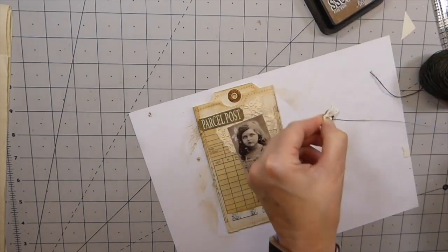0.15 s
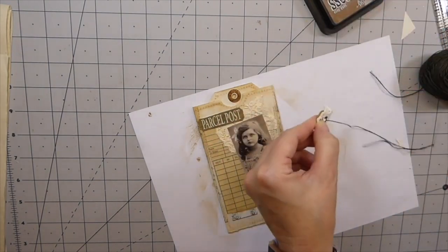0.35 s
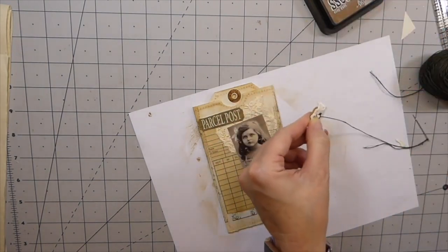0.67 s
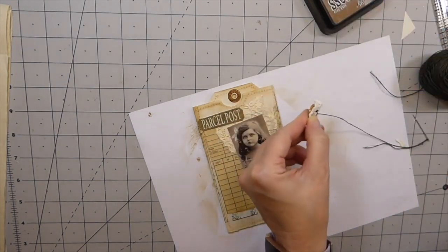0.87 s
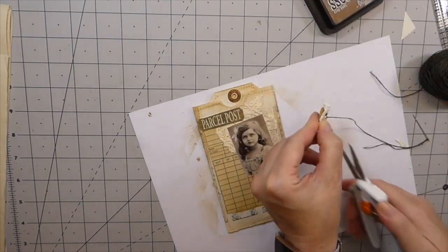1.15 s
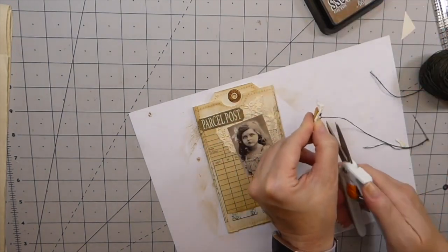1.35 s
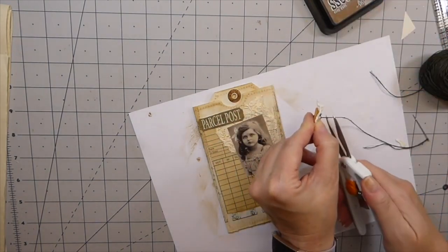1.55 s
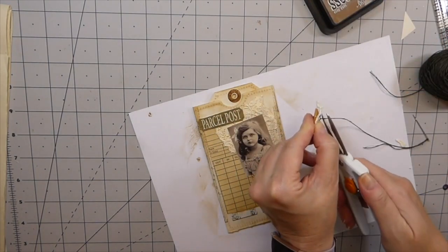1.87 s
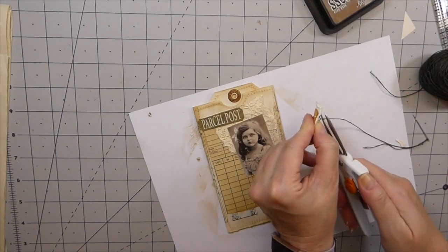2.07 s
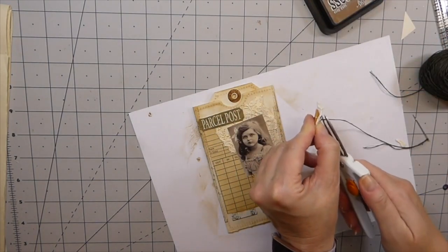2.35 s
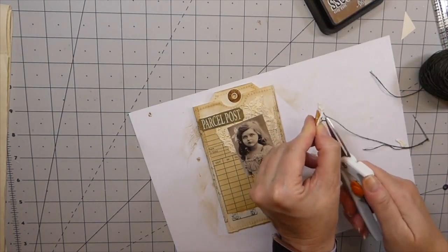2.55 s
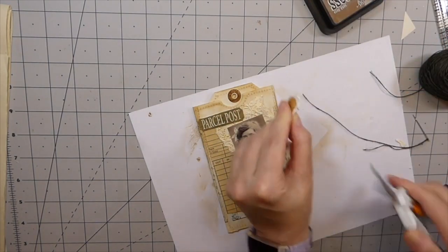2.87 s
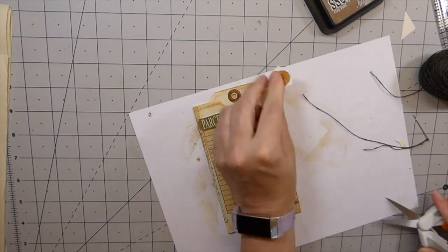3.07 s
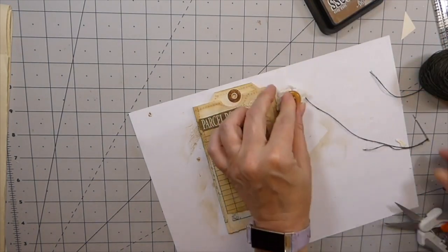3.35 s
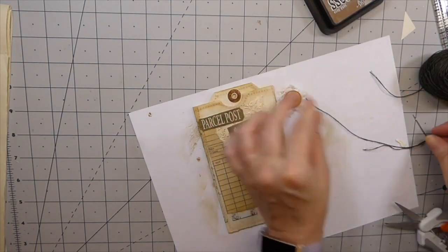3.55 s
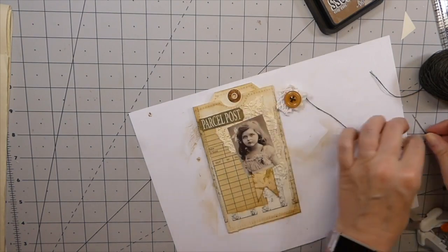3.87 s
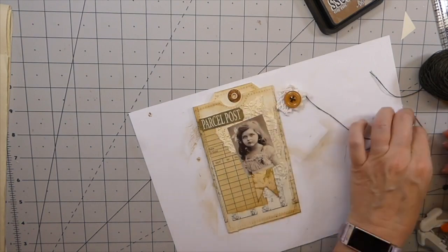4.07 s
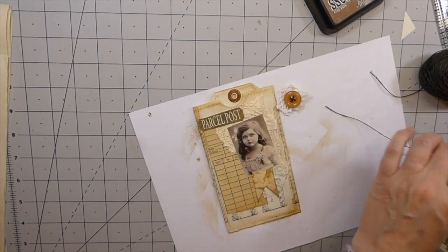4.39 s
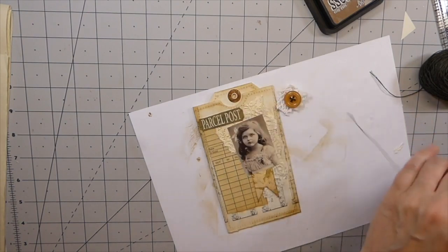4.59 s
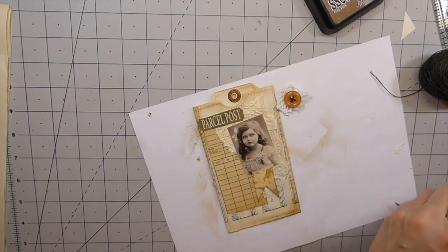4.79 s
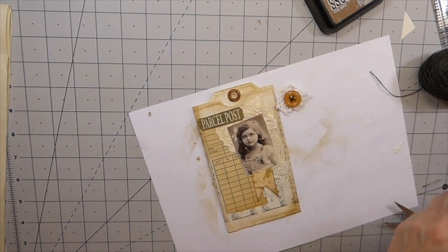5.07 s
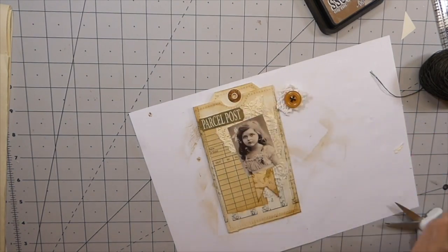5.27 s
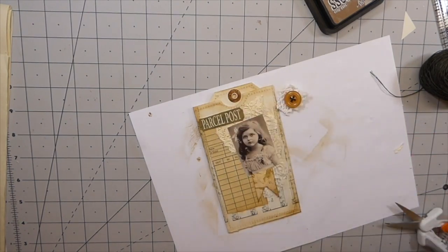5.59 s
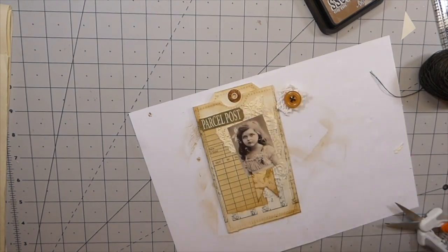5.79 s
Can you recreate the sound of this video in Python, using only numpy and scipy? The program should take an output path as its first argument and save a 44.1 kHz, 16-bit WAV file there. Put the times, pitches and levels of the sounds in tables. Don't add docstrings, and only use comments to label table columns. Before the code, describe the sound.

Close overhead stereo pickup of a craft table: a cluster of light metal ticks and short scrapes, small knocks, then only steady soft air noise. A bright quick snip through thread, a pause, then scissors smack the mat with a hard metallic crack, low table thump and short room tail. Tiny rubs and touches end it, fading to the distant fan.

```python
import sys
import numpy as np
from scipy import signal
from scipy.fft import rfft, irfft, next_fast_len
from scipy.io import wavfile
from scipy.ndimage import map_coordinates

SR = 44100
rng = np.random.default_rng(int(sys.argv[2]) if len(sys.argv) > 2 else 0)


def volts(x):
    e = np.asarray(x, float) / 20
    return 10 ** e


def persist_wave(psi):
    counts = np.round(np.clip(psi, -1, 1) * 32767).astype(np.int16)
    wavfile.write(sys.argv[1], SR, np.atleast_2d(counts).T)


N = 261513
SPAN = 8192

# (frequency [Hz], width [Hz], level [dB])
BLADES = [(6060, 625, -8.5), (6660, 790, -4.5), (7600, 880, -8.5), (8935, 480, -2.5), (9470, 580, -1.5),
          (10200, 300, -1), (11000, 150, -0.5), (12700, 600, -7)]
# (frequency [Hz], width [Hz], level [dB])
HANDLES = [(2470, 730, -2.5), (2820, 310, -1.5), (3192, 240, 0), (4362, 630, -3), (4700, 240, -3),
           (5300, 420, -4)]
# (frequency [Hz], width [Hz], level [dB])
KNOCK = [(670, 500, -3), (1005, 270, 4), (1220, 510, 2.5), (2074, 660, -1.5), (2866, 230, -10)]
# (frequency [Hz], width [Hz], level [dB])
MAT = [(336, 70, 0), (501, 82, 3), (680, 200, 1.5), (850, 430, -3.5), (1790, 1500, -16.5)]


def unit(x):
    return x / np.sqrt(np.mean(x ** 2) + 1e-20)


def along(points, hz):
    f, v = np.transpose(points)
    return np.interp(np.log(hz + 1), np.log(f + 1), v)


def curves(rows, rest=None):
    s, *columns = np.transpose(rows)
    t = np.arange(N) / SR
    return [np.interp(t, s, column, rest, rest) for column in columns]


def filtered(x, response):
    m = next_fast_len(x.shape[-1] + SPAN)
    spectrum = rfft(x, m) * response(np.fft.rfftfreq(m, 1 / SR))
    return irfft(spectrum, m)[..., :x.shape[-1]]


def body(modes, scatter_db=0):
    luck = rng.standard_normal(len(modes))

    def response(f):
        total = 0
        for k, (centre, width, db) in enumerate(modes):
            resonance = 1j * f * width / (centre * centre - f * f + 1j * f * width)
            total = total + (-1) ** k * volts(db + scatter_db * luck[k]) * resonance
        return total

    return response


def add(track, s, db, sound):
    track[round(s * SR):][:len(sound)] += volts(db) * sound / np.abs(sound).max()


def chatter(t60, spike):
    t = np.arange(SPAN) / SR
    force = rng.standard_normal(SPAN) * volts(-60 * t / max(t60, .001)) * (1 - np.exp(-t / 0.0001))
    force[4] += spike
    return force


def drop():
    # (time [s], blade crack peak [dB], handle crack peak [dB], slap peak [dB], chatter t60 [s])
    impacts = [
        (3.2261, -5.5, -9.5, -18, 0.0018),
        (3.2268, -17, -15, -8, 0.0074),
        (3.2295, -30.5, -17.5, -14, 0.02),
        (3.302, -29.5, -28, -26, 0.0055),
        (3.3033, -39, -31, -23, 0.023),
    ]
    # (frequency [Hz], width [Hz], level [dB])
    tip = [(7100, 820, -8), (7600, 1300, -3.5), (9780, 1300, -1.5), (10400, 900, -0.5), (11560, 1000, -8.5)]
    crack = [(2344, 510, -9), (3230, 240, 3.5), (4450, 990, -1.5)]
    slap = [(419, 120, 2), (750, 240, 3), (1010, 335, 3.5), (1259, 360, -4.5), (1560, 340, -6.5),
            (2100, 300, -4)]
    # (frequency [Hz], density [dB per Hz])
    spread = [(240, -31), (400, -3.5), (1100, -8), (1280, -10), (2120, -6.5), (2460, -10.5), (6090, -22.5),
              (9650, -24), (14000, -47.5)]
    out, blows = np.zeros(N + SPAN), np.zeros(N)
    for s, *levels_db, t60 in impacts:
        blows[round(s * SR)] = np.linalg.norm(volts(levels_db))
        for modes, db in zip((tip, crack, slap), levels_db):
            add(out, s, db, filtered(chatter(t60, spike=6.8), body(modes)))
    return out[:N], filtered(blows, lambda hz: volts(along(spread, hz)))


def thuds():
    # (time [s], peak [dB], pitch [Hz])
    pushes = [(.442, -36.5, 478), (.509, -40, 536), (.519, -35.5, 520), (.544, -47, 351), (.634, -56, 590),
              (.649, -42.5, 243), (.795, -38.5, 438), (.819, -33.5, 470), (3.301, -23, 293),
              (3.311, -20.5, 264.6), (3.813, -54.5, 597), (3.983, -37, 268), (3.994, -45, 272),
              (4.016, -45, 336), (4.963, -50, 262)]
    # (time [s], peak [dB], pitch [Hz])
    slams = [
        (3.164, -23, 294),
        (3.18, -42, 251),
        (3.212, -11.5, 297),
        (3.227, -18.5, 461),
        (3.264, -25.5, 314),
        (3.276, -17.5, 265),
        (3.334, -30, 258),
    ]
    # (frequency [Hz], width [Hz], level [dB])
    table_modes = [(150.6, 23, -11), (258, 17, 0), (270.4, 30, -11), (345, 23, -11.5), (446, 38, 0),
                   (664, 31, -4.5)]
    out, t = np.zeros(N + 2 * SPAN), np.arange(2 * SPAN) / SR
    for rows, t60, share in ((pushes, 0.031, 0.61), (slams, 0.012, 0.8)):
        for s, db, hz in rows:
            swell = (t * hz) ** 2 * volts(-60 * t / t60)
            spot = -np.sin(2 * np.pi * hz * t) * swell
            shock = np.sin(np.pi * np.minimum(t * hz * 1.244, 1)) ** 2
            ring = filtered(shock, body(table_modes, scatter_db=4))
            add(out, s, db - 5.5, unit(spot) + share * (270 / hz) ** 1.5 * unit(ring))
    return out[:N]


def contacts():
    touches = { "latch and spring": ((-0.5, -5, -8.5, 0.0122), [(.377, -30), (.3851, -29.5), (.3906, -29.5),
               (.5258, -23), (.5333, -34), (.7466, -32.5)]), "blade tick": ((1, -12.5, -23, -0.02),
               [(.4406, -39.5), (.4766, -32.5), (.5642, -35), (2.8624, -59), (3.102, -53), (3.163, -44.5),
               (4.3131, -50)]), "handle tap": ((-11, -3, -2.5, 0.18), [(.467, -45.5), (.5017, -50),
               (.7862, -42.5), (3.5687, -50.5)]), "knuckle on mat": ((-19, -17, -3, 0.16), [(.5426, -44),
               (.6319, -48), (.6495, -37.5), (.7954, -46), (.8174, -48), (3.2235, -30), (3.8144, -46.5),
               (4.1766, -52)]), "thread tail flick": ((-9.5, -6.5, -2, 0.08), [(3.165, -34.5), (3.983, -42),
               (4.0162, -41.5)]), "landing on mat": ((-14.5, -7.5, -1, 0.43), [(3.168, -47),
               (3.2108, -28.5)]), }
    # (time [s], peak [dB], frequency [Hz], t60 [s])
    rings = [(0.093, -62.5, 4450, .03), (0.38, -38, 1365, 0.061), (0.389, -43, 1384, 0.05),
             (0.388, -44, 1236, .12), (0.5023, -43.5, 4100, .03), (0.529, -35.5, 4150, 0.01),
             (0.7468, -43, 4140, 0.019), (0.7467, -41, 8240, 0.015), (0.7881, -44, 4590, .015),
             (2.864, -60, 10400, .03), (3.104, -63, 2930, .04), (3.568, -50.5, 3990, 0.026),
             (3.570, -57.5, 6470, .02), (4.012, -48, 1277, 0.2), (3.2293, -31.5, 9750, 0.046),
             (3.2295, -33.5, 10430, .04), (3.229, -31, 1235, .1), (3.302, -39.5, 1350, .12)]
    out, t = np.zeros(N + SPAN), np.arange(SPAN) / SR
    for (*mix_db, t60), rows in touches.values():
        for s, db in rows:
            for part_db, modes in zip(mix_db, (BLADES, HANDLES, KNOCK)):
                force = chatter(t60, spike=3)
                add(out, s, db + part_db - 2.5, filtered(force, body(modes, scatter_db=1.5)))
    for s, db, hz, t60 in rings:
        beat = 1 + 0.26 * np.sin(2 * np.pi * 0.054 * hz * t + 6 * rng.random())
        wander = .001 * np.sqrt(hz) * np.cumsum(rng.standard_normal(SPAN))
        envelope = volts(-60 * t / t60) * (1 - np.exp(-t / 0.00036))
        add(out, s, db, beat * np.sin(2 * np.pi * hz * t + wander) * envelope)
    return out[:N]


def snip():
    # (frequency [Hz], width [Hz], level [dB])
    shear = [(6560, 600, -10.5), (7670, 170, -16), (8650, 190, 0), (10100, 400, -8), (10940, 150, -1),
             (11700, 100, -1), (12700, 290, -10), (14400, 320, -26)]
    t = np.arange(N) / SR - 2.5985
    bite = volts(np.where(t < 0, 3300 * t, -3500 * t))
    sing = (t > 0) * volts(-17.5 - 550 * np.abs(t))
    grind = rng.standard_normal(N)
    edges = unit(filtered(grind, body(shear)))
    grip = unit(filtered(grind, body(HANDLES + KNOCK)))
    return volts(-37.5) * (bite + sing) * (edges + volts(-16) * grip)


def swells(rows, rise_s, fall_s, edges_db):
    shapes = []
    for s, hold, *db in rows:
        edge = np.subtract(db, edges_db)
        end = s + hold
        shapes.append([(s - rise_s, *edge), (s, *db), (end, *db), (end + fall_s, *edge)])
    return shapes


def friction(shapes, bodies):
    grip = volts(2.5 * rng.exponential(size=(3, N // 64 + 1))).repeat(64, axis=1)[:, :N]
    grit = rng.standard_normal((3, N)) * grip
    voices = []
    for g, modes, sharpness in zip(grit, bodies, (1, 2, 1)):
        response = body(modes)
        voices.append(unit(filtered(g, lambda hz: response(hz) ** sharpness)))
    out = np.zeros(N)
    for shape in shapes:
        for db, voice in zip(curves(shape, rest=-120), voices):
            out += volts(db - 3.5) * voice
    return out


def slide():
    # (time [s], hold [s], mat rumble [dB], handle squeal [dB], blade hiss [dB])
    jerks = [
        (.444, 0.0076, -41.5, -42, -50),
        (.474, 0.014, -42, -42, -48.5),
        (.500, 0.0081, -44.5, -58, -55),
    ]
    # (frequency [Hz], width [Hz], level [dB])
    squeal = [(2867, 220, 5), (4150, 230, 0)]
    shapes = swells(jerks, rise_s=0.015, fall_s=0.018, edges_db=(10, 27, 15))
    return friction(shapes, (MAT, squeal, BLADES))


def brush():
    # (time [s], hold [s], mat rumble [dB], paper [dB], thread hiss [dB])
    rubs = [(.115, 0.15, -74, -84, -70.5), (.635, 0.029, -55.5, -81, -86), (.792, 0.012, -47.5, -55.5, -62),
            (2.605, .004, -61, -65, -70), (2.795, 0.056, -86, -89, -69), (3.99, 0.042, -56.5, -62, -64),
            (4.18, 0.032, -60, -75, -71.5), (4.238, .004, -59, -66, -75), (4.265, 0.023, -65, -60, -76)]
    # (frequency [Hz], width [Hz], level [dB])
    paper = [(4120, 620, -2), (2950, 2500, -6)]
    shapes = swells(rubs, rise_s=0.028, fall_s=0.0088, edges_db=(22, 27, 18))
    return friction(shapes, (MAT, paper, BLADES))


def room(x, decay):
    hz, t, z = signal.stft(rng.standard_normal((2, SR // 2)), SR, nperseg=256)
    z[1] *= np.clip(hz / 1300, 0, 1)[:, None]
    dying = z * volts(-60 * t / along(decay, hz)[:, None])
    mid, side = signal.istft(dying, SR, nperseg=256)[1]
    tail = np.array([mid + side, mid - side]) / np.linalg.norm(mid)
    delayed = np.pad(x, (90, 0))[None]
    return signal.fftconvolve(delayed, tail, axes=1)[:, :N]


def clatter(blows):
    # (frequency [Hz], t60 [s])
    clatter_decay = [(400, 0.41), (1500, 0.19), (4000, 0.22), (9000, 0.15), (12000, 0.17)]
    rattle = volts(3.1 * rng.exponential(size=N // 96 + 1)).repeat(96)[:N]
    return volts(15) * room(blows, clatter_decay) * rattle


def ports(x):
    # (frequency [Hz], level difference [dB])
    tilt = [(60, 0), (110, 3.5), (200, 1), (380, 2.5), (700, 7.5), (1290, -2), (2380, -4.5), (4400, -4),
            (8120, -4.5), (15000, -3)]
    port = np.array([[1], [-1]])

    def lean(hz):
        delay = np.exp(-1j * port * np.pi * hz * 6e-6)
        return volts(port * along(tilt, hz) / 2) * delay

    return filtered(x, lean)


def air():
    # (frequency [Hz], density [dB per Hz])
    rush_mid = [(18, -62.5), (30, -30), (64, -22), (243, -7), (276, -8), (333, -10.5), (500, -6),
                (558, -11), (590, -5), (636, -8.5), (765, -8.5), (920, -15), (2500, -25), (3250, -52),
                (5500, -120)]
    rush_side = [(18, -50.5), (30, -22.5), (98, -18), (184, -7.5), (280, -6.5), (486, -2.5), (1390, -5.5),
                 (2410, -17.5), (3310, -18), (5170, -24), (13300, -28.5), (14800, -39.5), (16000, -49.5)]
    # (frequency [Hz], density [dB per Hz])
    mic_hiss = [(1470, -38), (2500, -19), (2740, -1), (3110, 0.5), (3630, -2.5), (4270, -0.5), (5610, -7.5),
                (6550, -4), (8020, -6.5), (10600, -3.5), (14000, -13.5), (15200, -13), (15500, -40)]
    # (frequency [Hz], width [Hz], level [dB])
    fan_modes = [(332.5, 14, -0.5), (452, 16, -11), (658.7, 18.9, -2.5), (1200, 14, -6.5), (1420, 20, -6)]
    # (time [s], level [dB])
    motor = [(0, -62.5), (1.8, -65.5), (3.3, -70.5), (3.6, -70), (5.93, -71.5)]
    hum_db, = curves(motor)
    rates_hz = np.array([[5], [18], [12]])
    rows = np.arange(3)[:, None] + np.zeros(N)
    steps = np.arange(N) / SR * rates_hz
    drift, waver, sway = map_coordinates(rng.standard_normal((3, 200)), [rows, steps])

    def noise(spectrum):
        return unit(filtered(rng.standard_normal(N), lambda hz: volts(along(spectrum, hz))))

    fan = body(fan_modes)
    whistles = unit(filtered(rng.standard_normal(N), lambda hz: fan(hz) ** 2))
    mid = noise(rush_mid) + volts(-9.5) * noise(mic_hiss) + volts(-8.5) * whistles
    side = volts(-1.0) * noise(rush_side)
    rush = volts(-61.5 + 0.14 * drift) * np.array([mid + side, mid - side])
    phase = 2 * np.pi * np.cumsum(602 + 1.65 * waver) / SR
    hum = np.sqrt(2) * np.sin(phase + np.array([[-.35], [.35]]))
    return rush + volts(hum_db + 0.5 + 1.6 * sway) * hum


def scene():
    # (frequency [Hz], t60 [s])
    room_decay = [(150, 0.17), (500, 0.27), (2000, 0.16), (6000, 0.15), (12000, 0.086)]
    steel = contacts() + snip() + slide() + brush()
    clack, blows = drop()
    table = thuds()
    near = ports(steel + clack + table)
    near += volts(-8.5) * room(steel + 1.07 * table, room_decay)
    near += clatter(blows)
    high = signal.butter(4, 105, "high", fs=SR, output="sos")
    low = signal.butter(5, 11500, "low", fs=SR, output="sos")
    return signal.sosfilt(np.vstack([high, low]), near) + air()


def top_cut(x):
    return signal.sosfilt(signal.butter(12, 16370, fs=SR, output="sos"), x)


def record(dry):
    return top_cut(dry)


dry = scene()
out = record(dry)
persist_wave(out)
```